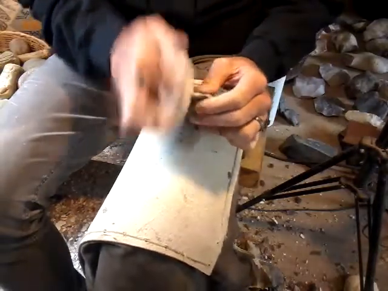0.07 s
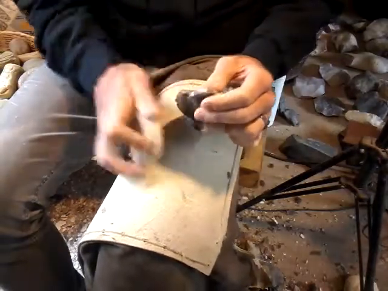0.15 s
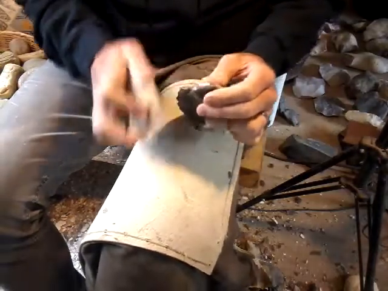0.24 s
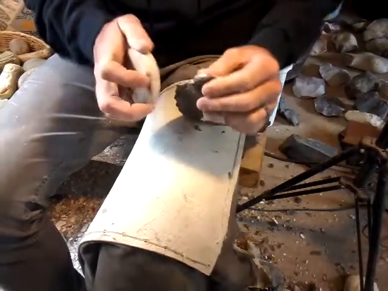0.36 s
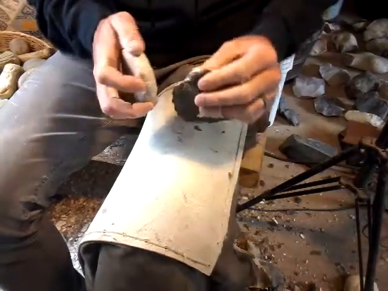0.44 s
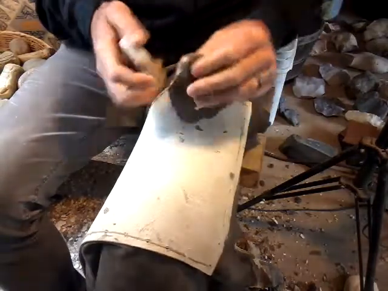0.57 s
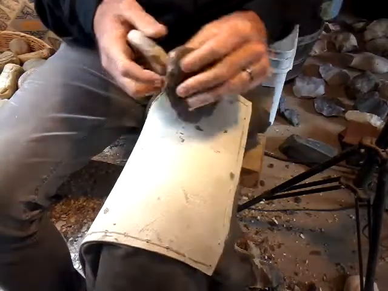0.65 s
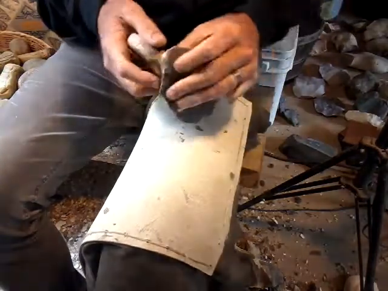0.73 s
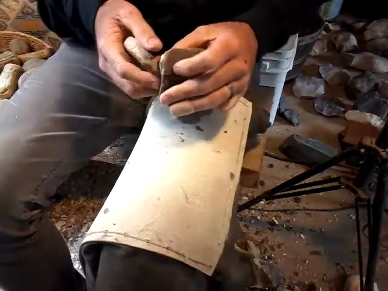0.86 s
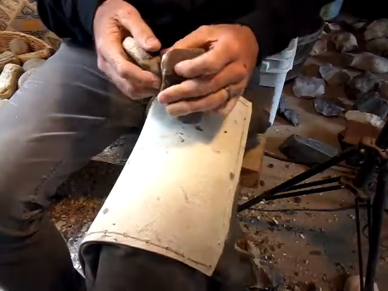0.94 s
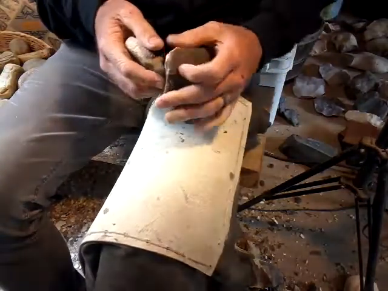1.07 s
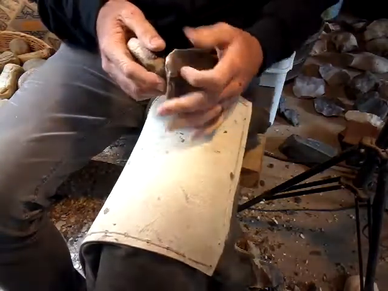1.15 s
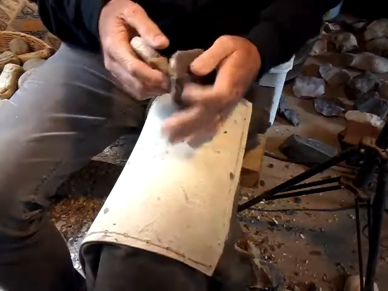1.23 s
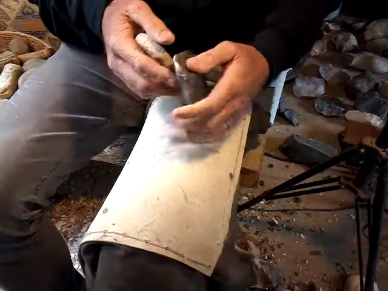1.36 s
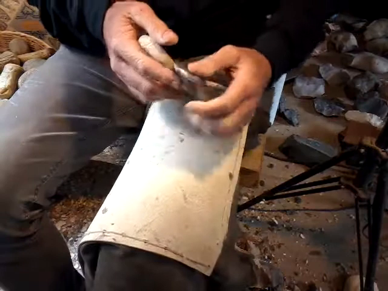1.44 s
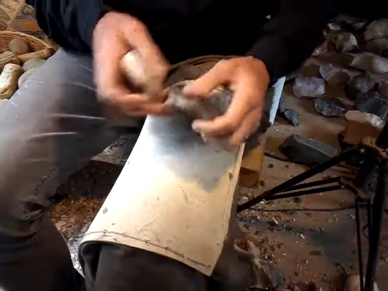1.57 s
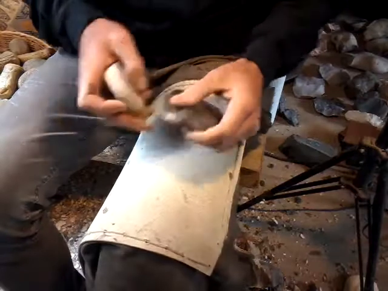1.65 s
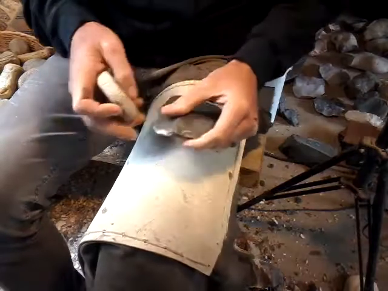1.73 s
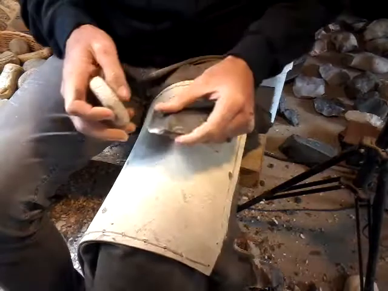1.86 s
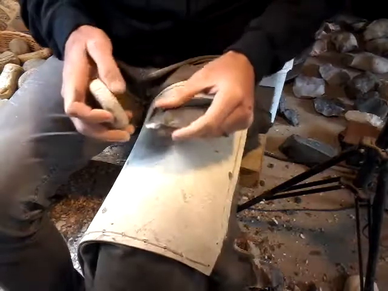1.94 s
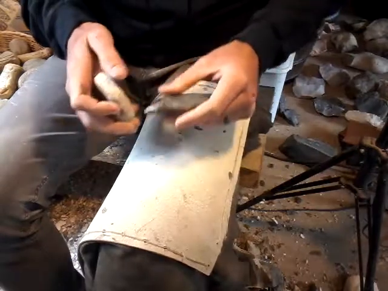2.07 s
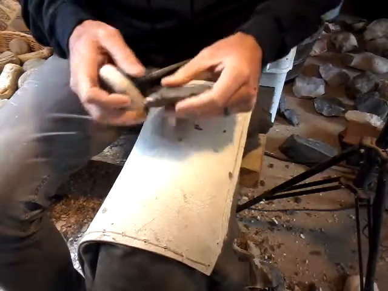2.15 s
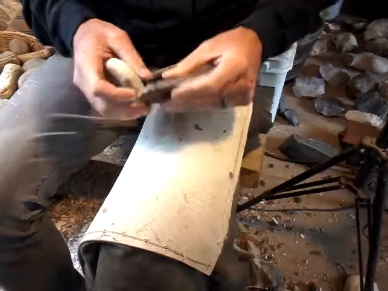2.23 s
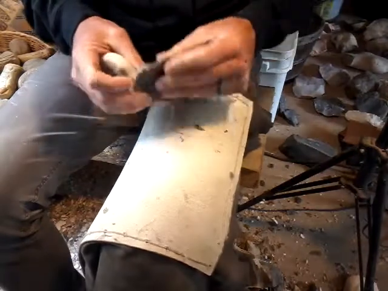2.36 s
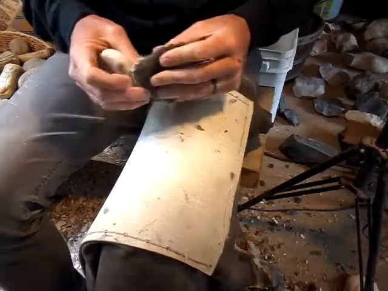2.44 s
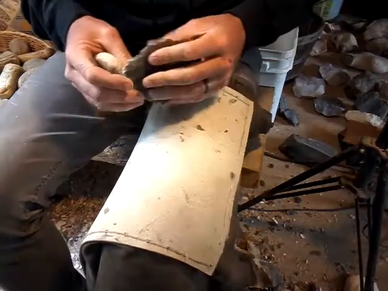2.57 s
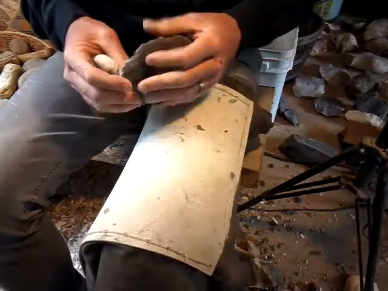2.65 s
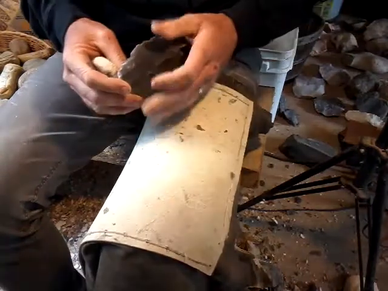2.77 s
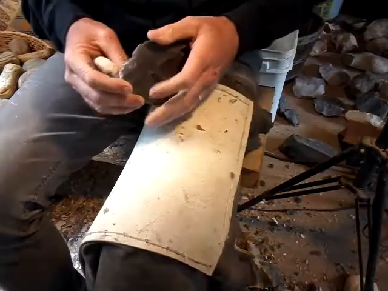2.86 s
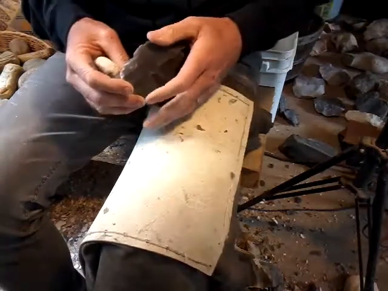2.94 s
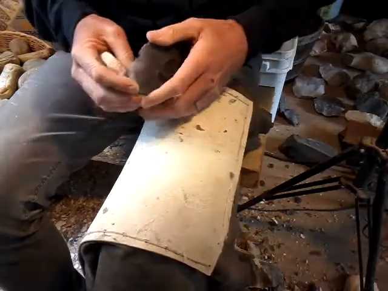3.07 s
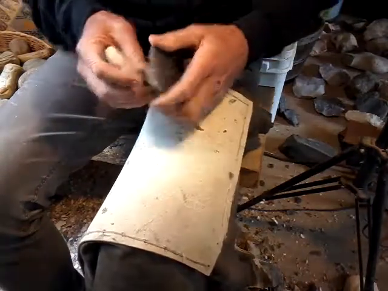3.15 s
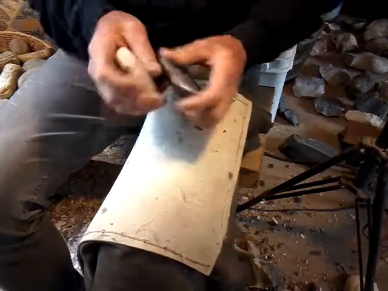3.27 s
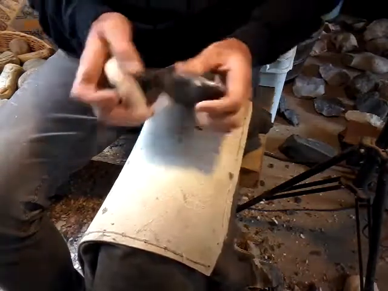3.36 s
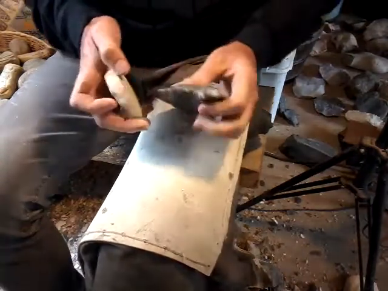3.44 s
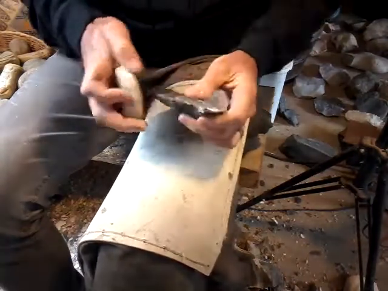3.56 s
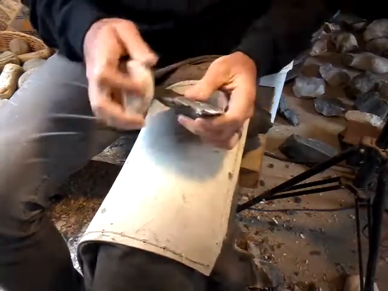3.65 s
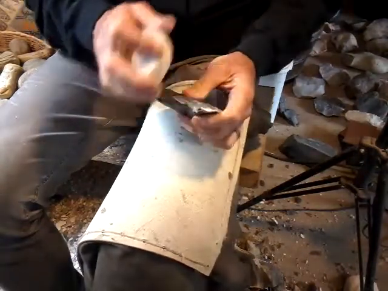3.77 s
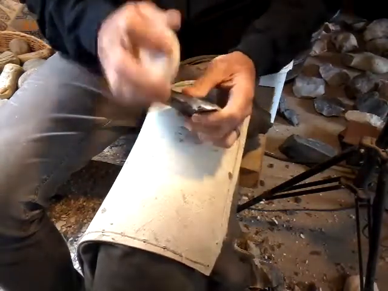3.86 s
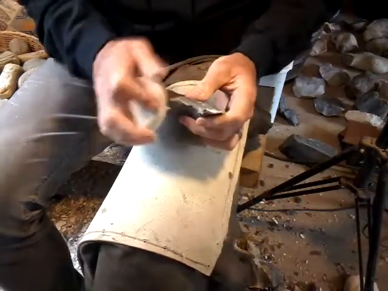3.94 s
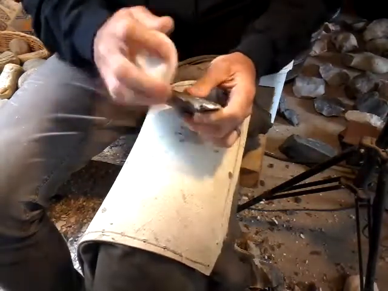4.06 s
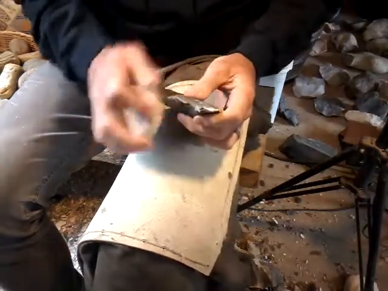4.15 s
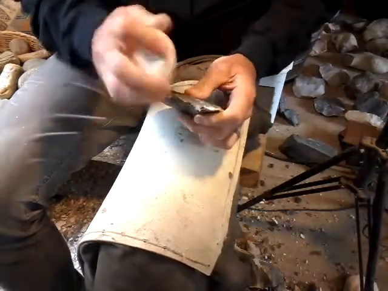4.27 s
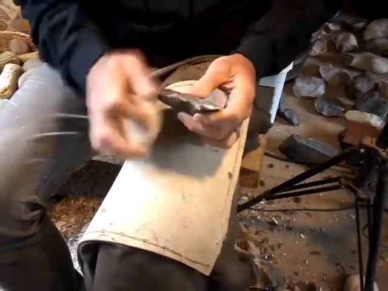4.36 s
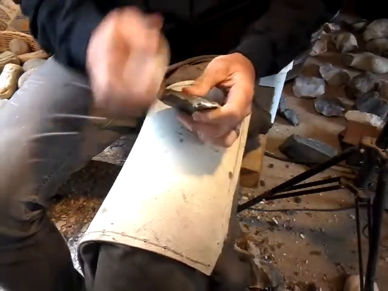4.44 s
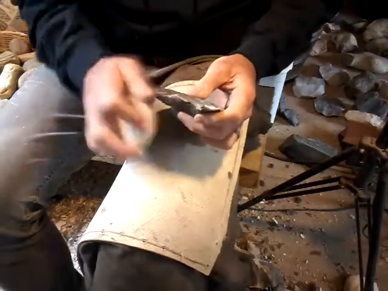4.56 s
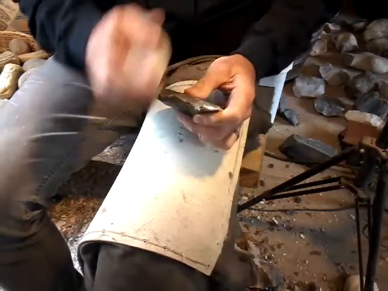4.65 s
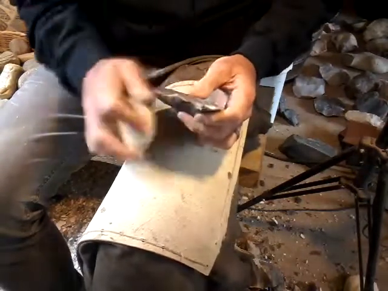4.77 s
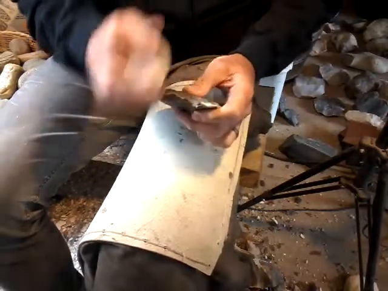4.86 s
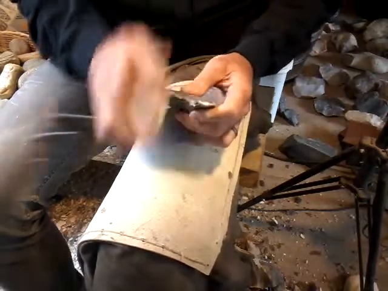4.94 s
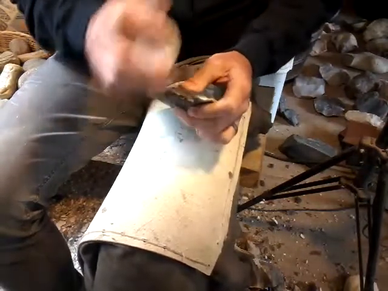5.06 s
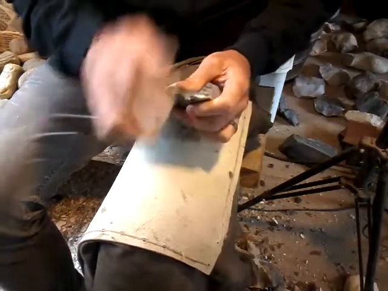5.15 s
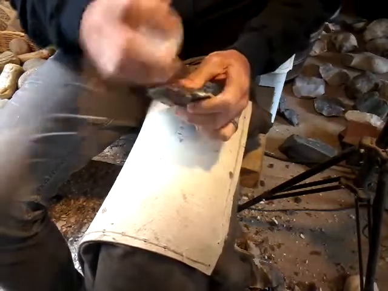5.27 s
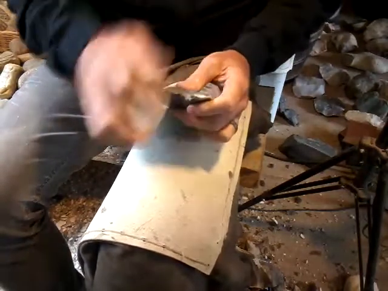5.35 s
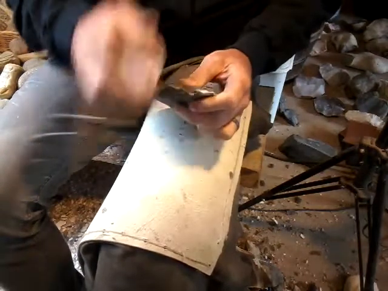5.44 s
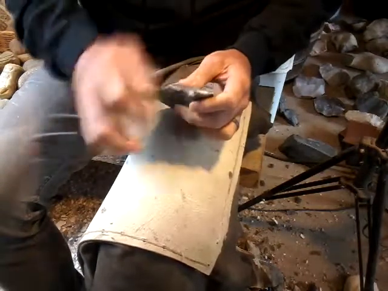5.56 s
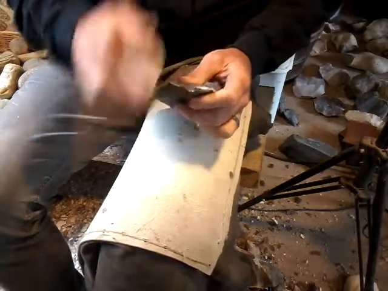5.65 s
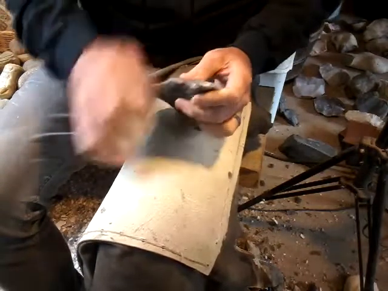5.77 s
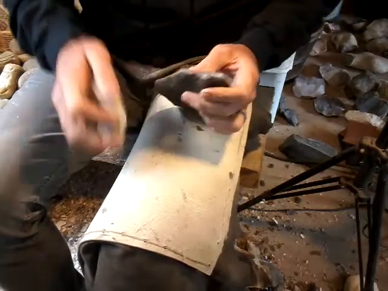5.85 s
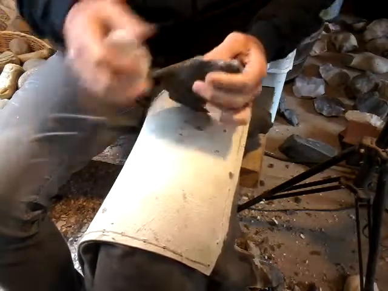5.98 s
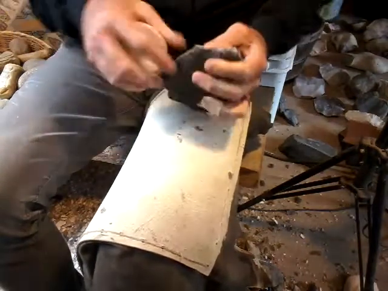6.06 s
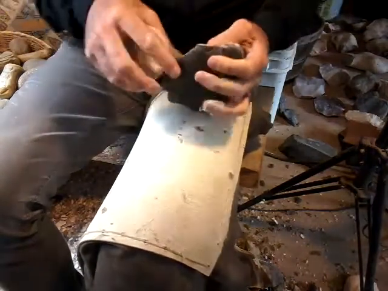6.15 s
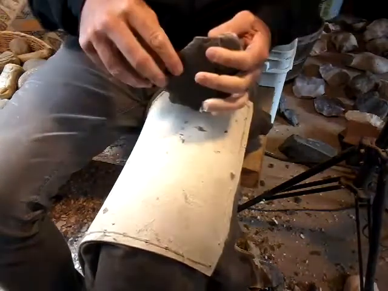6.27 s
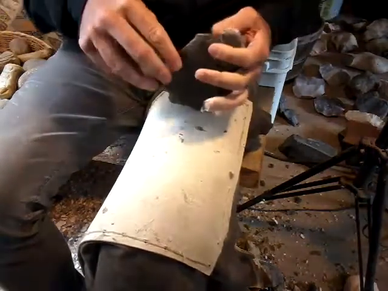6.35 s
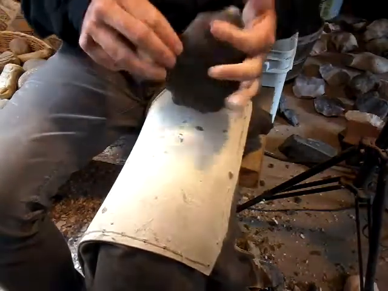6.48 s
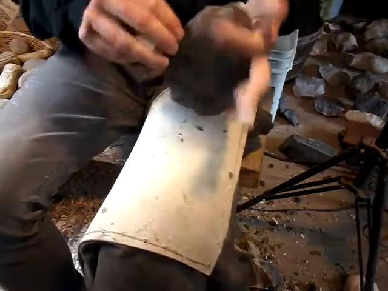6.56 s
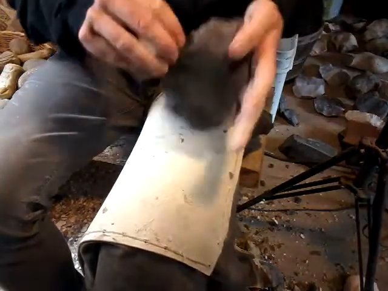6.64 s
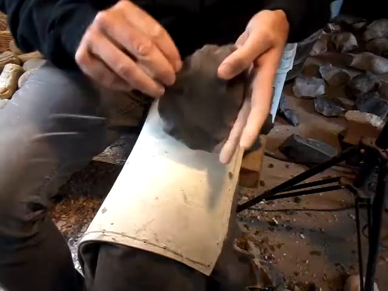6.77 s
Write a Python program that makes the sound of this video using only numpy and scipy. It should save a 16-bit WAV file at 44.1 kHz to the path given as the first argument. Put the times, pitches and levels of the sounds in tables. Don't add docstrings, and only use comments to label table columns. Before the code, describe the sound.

Close stereo pickup in a small shed with short, bright reflections, over faint low hum, cloth rustle and hiss. The tail of a stone stroke opens, then at 0.14 s a loud, hard knock breaks into a gritty crunch of tiny clicks lasting under a tenth of a second. Near quiet follows, with a barely audible tick at 0.4 s. At 1.3 s hands softly bump the lap; around 1.5-1.8 s the stone is turned with small clacks and thin rings. Light taps come at 2.3 s, then dry, hissy skin brushes at 2.4 and 3.0-3.6 s with dull bumps. From 3.97 to 5.83 s, ten short scratchy blows land about every 0.2 s, the first ones lighter, later ones forceful, each a mid-pitched stony crack with crumbling grind. A small tap at 6.14 s and faint clicks and rubs around 6.4-6.6 s finish.

```python
import sys
import numpy as np
from scipy import signal
from scipy.fft import rfft, irfft, next_fast_len
from scipy.io import wavfile
from scipy.ndimage import uniform_filter1d

SR = 44100
rng = np.random.default_rng(int(sys.argv[2]) if len(sys.argv) > 2 else 0)


def ratio(d):
    e = np.asarray(d, float) / 20
    return 10 ** e


def file_out(sig):
    cols = np.atleast_2d(sig).T
    lim = np.clip(cols, -1, 1)
    pcm = np.round(lim * 32767).astype(np.int16)
    wavfile.write(sys.argv[1], SR, pcm)


N = 300321
LEAD = SR // 5
M = N + LEAD


def sample_at(s):
    return int(s * SR) + LEAD


def clock():
    return (np.arange(M) - LEAD) / SR


def row_on(starts):
    return np.clip(np.searchsorted(starts, clock()) - 1, 0, None)


def along(table, size):
    hz, value = np.transpose(table)
    bins = np.arange(size // 2 + 1) * SR / size + 1
    return np.interp(np.log(bins), np.log(np.maximum(hz, 1)), value)


def response(table, size=2048):
    fold = irfft(along(table, size) * np.log(10) / 20)
    fold[1:size // 2] *= 2
    fold[size // 2 + 1:] = 0
    h = irfft(np.exp(rfft(fold)))[:size // 2]
    return h / np.abs(h).max()


def swing(h, hz, damp):
    a = [1, -2 * damp * np.cos(2 * np.pi * hz / SR), damp ** 2]
    h = signal.lfilter(a[::-1], a, h)
    return h / np.abs(h).max()


def through(x, h):
    return signal.fftconvolve(x, h)[:len(x)]


def ring(x, hz, t60):
    pole = np.exp(2j * np.pi * hz / SR - np.log(1000) / (t60 * SR))
    return signal.lfilter([1], [1, -pole], x).imag


# start in seconds, length in seconds, landing in dB, grind in dB, sharpness of the edge in dB.
STROKES = [(-.065, 0.049, -20, -28, 5.5), (0.1378, 0.066, -6, -31.5, -4), (3.965, 0.035, -13.5, -31, -0.5),
           (4.177, 0.027, -19, -38.5, 6.5), (4.3858, 0.028, -8, -31.5, 4), (4.593, 0.013, -6, -29, -6),
           (4.8001, 0.033, -5.5, -27.5, -6.5), (4.9974, 0.017, -6.5, -25, -3.5),
           (5.201, 0.027, -5, -27.5, -0.5), (5.4009, 0.019, -6.5, -26, 5.5),
           (5.5998, 0.027, -2.5, -29.5, -3), (5.8025, 0.032, -3.5, -34.5, 1)]
# time in seconds, body in dB, edge in dB.
TEETH = [(0.1495, -24, -31), (0.1512, -23, -31), (0.1597, -11.5, -29.5), (0.1634, -14.5, -38.5),
         (0.1682, -13.5, -29), (0.1744, -26.5, -30.5), (3.9728, -28, -28), (3.976, -25, -34.5),
         (3.9783, -55, -25), (3.9811, -20, -40), (3.9847, -33.5, -34), (3.9862, -34.5, -40),
         (3.9903, -20.5, -24.5), (3.9941, -34, -29.5), (4.0005, -20, -38), (4.1814, -26, -40.5),
         (4.1842, -53, -37.5), (4.1878, -19, -46), (4.1896, -19.5, -40.5), (4.1926, -27, -56.5),
         (4.1967, -32, -61), (4.199, -20, -27), (4.2008, -28, -32.5), (4.2041, -25, -36),
         (4.3899, -25, -30.5), (4.3941, -16.5, -45), (4.3981, -17.5, -31.5), (4.4046, -12, -22.5),
         (4.5965, -25, -35.5), (4.5994, -13.5, -17), (4.6054, -11.5, -28), (4.6084, -11, -25.5),
         (4.8062, -19.5, -20), (4.8107, -7.5, -23), (4.8159, -7, -26), (5.0033, -22, -37),
         (5.0074, -28.5, -28.5), (5.0102, -21, -29), (5.0128, -12.5, -24.5), (5.2048, -29, -33.5),
         (5.2113, -12, -17.5), (5.2125, -29, -18.5), (5.2155, -11, -33.5), (5.2192, -25, -24),
         (5.2241, -18, -28), (5.2292, -18, -19.5), (5.4038, -7, -29.5), (5.4084, -9, -28),
         (5.4131, -13, -38), (5.4159, -13, -38), (5.4202, -12, -25), (5.4226, -12.5, -15),
         (5.4261, -17, -14), (5.6143, -14, -15), (5.8062, -18.5, -15.5), (5.8111, -10.5, -28),
         (5.815, -11, -23.5), (5.8174, -21.5, -35.5), (5.8211, -19, -18.5)]
# time in seconds, palm in dB, body in dB, edge in dB.
TAPS = [(1.4866, -52, -60, -85), (1.508, -42.5, -27.5, -80), (1.52, -46, -43, -69), (1.5287, -46, -55, -85),
        (1.543, -61, -29.5, -33.5), (1.5494, -60, -36, -39), (1.5554, -59, -34, -54),
        (1.5675, -49, -34, -57), (1.5725, -65, -40, -59), (1.5775, -62, -38.5, -65),
        (1.7747, -75, -53, -64), (1.778, -75, -50, -70), (1.783, -70, -49, -72), (1.803, -68, -48, -80),
        (2.2592, -52, -43.5, -46.5), (2.2649, -59, -44.5, -66), (2.2753, -34.5, -37.5, -69),
        (2.281, -56, -57, -81), (2.291, -51, -51, -66), (2.3778, -57, -53, -78), (2.3867, -48, -67, -75),
        (3.025, -75, -55, -51), (3.03, -75, -62.5, -59), (3.199, -75, -37.5, -51), (3.2079, -61, -43, -51),
        (3.333, -47, -56, -65), (3.5492, -69, -50, -61), (6.1446, -30.5, -32.5, -38),
        (6.437, -52, -72, -54), (6.4782, -54, -52, -78), (6.3935, -82, -70, -61), (3.332, -70.5, -45, -59),
        (6.5198, -72, -52, -69), (6.5335, -70, -67, -75), (6.5403, -75, -61, -55), (6.5555, -67, -61, -58),
        (6.5655, -67, -64, -50), (6.574, -68, -59, -62), (6.5935, -68, -52, -50.5),
        (6.5797, -58, -32.5, -56), (6.5881, -63, -39, -47)]
# time in seconds, level in dB.
SLAPS = [(0.1387, -13.5), (1.5066, -54), (1.55, -38), (2.2579, -40), (2.2662, -43), (3.9787, -45),
         (4.39, -36), (4.5976, -18), (4.817, -15.5), (4.997, -14), (5.01, -28), (5.802, -33.5),
         (5.815, -17.5), (6.144, -39), (6.44, -51), (6.585, -41.5)]
LANDING_PALM_DB, LANDING_EDGE_DB = -17, -10
TOOTH_PALM_DB, TOOTH_PALM_SHARE = -22, 0.49
FACE_DB = -23


def contacts():
    rows = [(s, db + LANDING_PALM_DB, db, db + LANDING_EDGE_DB + sharp) for s, _, db, _, sharp in STROKES]
    rows += [(s, TOOTH_PALM_DB + TOOTH_PALM_SHARE * db, db, edge) for s, db, edge in TEETH]
    rows += TAPS
    rows = [(s, palm, body, (body + edge) / 2 + FACE_DB, edge) for s, palm, body, edge in rows]
    slaps = [(s, -np.inf, -np.inf, db, -np.inf) for s, db in SLAPS]
    return np.transpose(rows + slaps)


# lag in seconds, its spread in seconds as the hands move, level in dB.
PAD_ECHO = (.0018, .0005, -10)


def pad_lags(count):
    lag_s, spread_s, _ = PAD_ECHO
    return np.abs(SR * (lag_s + spread_s * rng.uniform(-1, 1, count))).astype(int)


def knocks(times, db, chatter, chatter_s, lags):
    out, t = np.zeros(M), np.arange(SR // 200) / SR
    crumble = chatter * rng.standard_normal((len(times), len(t))) * np.exp(-t / chatter_s)
    crumble[:, 0] = 1
    for s, gain, shape, lag in zip(times, ratio(db), crumble, lags):
        i = sample_at(s)
        out[i:i + len(t)] += gain * shape
        out[i + lag:i + lag + len(t)] += gain * shape * ratio(PAD_ECHO[2])
    return out


def sliding(rows, fall=0.39, release=0.091):
    out = np.zeros(M)
    for s, length, rise, db in rows:
        i, n = sample_at(s), int(length * (1 + release) * SR)
        shares = [0, np.clip(rise, .01, .9), 1, 1 + release]
        out[i:i + n] += ratio(db) * np.interp(np.arange(n) / SR / length, shares, [0, 0.94, fall, 0.00017])
    return out


def grit(scatter_db, per_s):
    hit, size, sign = rng.random(M), rng.exponential(size=M), rng.standard_normal(M)
    x = (hit < per_s / SR) * ratio(scatter_db * size) * sign
    return x / x.std()


# start in seconds, length in seconds, rise as a share 0-1, body grind in dB, edge grind in dB.
RUBS = [(1.518, 0.02, 0.06, -52.5, -74), (1.539, 0.049, 0, -54, -55.5), (1.645, 0.032, 0.1, -65, -74),
        (1.752, 0.024, 0.56, -73, -74), (2.259, 0.02, 0, -65, -68), (2.271, 0.045, 0.1, -65, -76),
        (3.031, 0.0242, 0, -68.5, -62), (3.204, 0.13, 0, -64.5, -65.5), (3.327, 0.067, 0.14, -60, -65.5),
        (3.945, 0.016, 0.8, -62, -75), (6.141, 0.012, 0.05, -58.5, -62), (6.407, 0.018, 0.23, -89, -71),
        (6.422, 0.028, 0.44, -59.5, -56), (6.52, 0.038, 0.3, -69, -74), (6.547, 0.03, 0.6, -51, -54)]
STROKE_RISE = 0.052
GRIND_BODY_DB, GRIND_EDGE_DB = -4.5, -9


def grinding():
    on_body = [(s, n, STROKE_RISE, db + GRIND_BODY_DB) for s, n, _, db, _ in STROKES]
    on_body += [(s, n, rise, db) for s, n, rise, db, _ in RUBS]
    on_edge = [(s, n, STROKE_RISE, db + GRIND_EDGE_DB + sharp) for s, n, _, db, sharp in STROKES]
    on_edge += [(s, n, rise, db) for s, n, rise, _, db in RUBS]
    return sliding(on_body) * grit(2.2, 5000), sliding(on_edge) * grit(1.8, 9800)


# start in seconds, pitch factor of the body, dB below its peak, dB above its peak.
HOLD = [(-.1, 0.95, 5.5, 1), (.13, 0.97, 1, -4), (1.4, 1.01, 2, 8.5), (1.535, 0.82, -3, 10),
        (2.2, 1.05, 1.5, 0.5), (3.0, .99, -7, -3), (3.94, 1.036, 4, -5.5), (4.17, 1, 1.5, 2),
        (4.38, 1, 4, 0.5), (4.59, 0.98, -0.5, -0.5), (4.79, 1.004, 0, 1.5), (4.99, .99, -0.5, -1.5),
        (5.19, 0.96, 0.1, 0), (5.39, 0.96, -0.5, 0), (5.59, 0.99, -3.3, 1), (5.79, 0.97, -1.1, -1.5),
        (6.1, 1.06, 0, -0.5), (6.5, 1, -8.5, 6)]


def holds():
    return row_on(np.transpose(HOLD)[0])


# frequency in Hz, level in dB.
BODY = [(300, -60.5), (750, -14.5), (1050, -5), (1600, -4), (2000, 2.5), (2550, 1), (3000, -12),
        (4000, -23.5), (6000, -38)]
CUP_LOW_HZ, CUP_HIGH_HZ = 1500, 2700


def body_response(colour):
    return swing(response(colour), 2800, .7)


def cupped(push):
    out, which = np.zeros(M + 1024), holds()
    for k, (_, pitch, low_db, high_db) in enumerate(HOLD):
        colour = [(hz * pitch, db + low_db * (hz < CUP_LOW_HZ) + high_db * (hz > CUP_HIGH_HZ))
                  for hz, db in BODY]
        span = np.flatnonzero(which == k)
        sound = signal.fftconvolve(push[span], body_response(colour))
        out[span[0]:span[0] + len(sound)] += sound
    return out[:M]


# start in seconds, then first, second, third and fourth family in dB.
GRIP = [(-.1, -13.5, -51.5, -31.5, -27), (.13, -22, -47.5, -24.5, -32), (1.48, -30, -4, -14, -30),
        (1.54, -6.5, -15.5, -43, -31), (1.547, -10.5, -26, -41, -13), (1.74, -7, -37, -28, 3),
        (2.25, -29, -41.5, -31, -35), (2.27, -30, -28, 2.5, -10), (2.37, -14, -22, -30, -30),
        (3.0, -39.5, -43, -32, -38), (3.96, -20, -22, -22, -32), (4.17, -33, -20, -20, -29),
        (4.38, -38, -20.5, -32, -45), (4.59, -39, -20.5, -27, -39.5), (4.79, -38, -20, -24, -33),
        (4.99, -22, -25.5, -23, -38), (5.19, -18, -28, -28, -31.5), (5.39, -20.5, -26, -35.5, -30),
        (5.59, -28.5, -23.5, -38, -30.5), (5.79, -24.5, -28.5, -44, -40), (6.14, -8.5, -32, -14, -15),
        (6.38, -16, -25, -20, -6.5), (6.51, -3.5, -17, -22, -2)]
# frequency in Hz, level in dB, t60 in seconds.
FLINT = [
    [(7425, -3, .07), (7390, -6, .05), (7400, -10, .008)],
    [(8755, -2, .065), (8695, -6, .055), (8650, -8, .008)],
    [(9700, 0, .011), (9900, -5, .009)],
    [(13290, -2, .026), (13180, -12, .012), (13000, -12, .005)],
]
LANDING_RING_DB = -9


def flint_ring(scratch):
    strike, out = scratch.copy(), 0
    for s, _, db, *_ in STROKES:
        strike[sample_at(s)] += ratio(db + LANDING_RING_DB)
    start, *free = np.transpose(GRIP)
    which = row_on(start)
    for family, free_db in zip(FLINT, free):
        drive = strike * ratio(free_db)[which]
        out = out + sum(ratio(db) * ring(drive, hz, t60) for hz, db, t60 in family)
    return out


# time in
# seconds, frequency in Hz, level in dB, t60 in seconds.
CHIP = [(.413, 12050, -71, .07), (.413, 9600, -68, .05), (.413, 6000, -68, .012), (1.486, 1300, -54, .015),
        (1.642, 1450, -56, .04), (1.776, 1000, -60, .05), (1.546, 1800, -38, .03), (1.557, 1950, -42, .03),
        (1.7745, 1900, -50, .012), (1.778, 2000, -51, .012), (1.784, 2050, -52, .015),
        (6.146, 650, -49, .025), (6.432, 700, -56, .03), (6.425, 2500, -58, .02), (6.435, 2650, -54, .02),
        (6.437, 4600, -54, .015), (6.431, 4900, -58, .015), (6.5335, 2800, -54, .01),
        (6.5655, 2700, -48, .01), (6.572, 2000, -48, .02), (2.261, 7420, -64, .12), (2.379, 7420, -66, .07),
        (2.288, 8750, -64, .06), (2.522, 2900, -64, .01), (4.562, 2400, -54, .01), (2.276, 620, -42, .02),
        (2.277, 1150, -45, .015), (2.291, 900, -48, .015), (2.378, 650, -48, .02), (2.388, 750, -52, .02),
        (3.2, 125, -52, .15), (3.551, 150, -50, .2), (3.575, 150, -54, .1)]


def chips():
    out, n = np.zeros(M), SR // 5
    for s, hz, db, t60 in CHIP:
        i = sample_at(s)
        out[i:i + n] += ratio(db) * ring(np.arange(n) == 0, hz, t60)
    return out


# start in seconds, length in seconds, level in dB.
BUMPS = [
    (1.314, 0.034, -44.5),
    (1.504, 0.032, -58),
    (3.176, 0.1, -50.5),
    (3.335, 0.095, -54),
    (3.544, 0.074, -42.5),
    (6.138, 0.012, -46),
]
BUMP_RISE, STROKE_THUMP_DB = 0.27, -44.5


def lap_thump():
    on_lap = [(s, n, STROKE_RISE, STROKE_THUMP_DB) for s, n, *_ in STROKES]
    on_lap += [(s, n, BUMP_RISE, db) for s, n, db in BUMPS]
    blow = sliding(on_lap) * ratio(30.5) * ring(rng.standard_normal(M), 125, 0.021) / 16
    return ring(np.diff(blow, 2, prepend=[0, 0]), 160, 0.026)


# frequency in Hz, level in dB.
PALM = [(60, -42), (130, -19), (240, -2), (500, 0), (750, -2), (1000, -8), (1600, -26), (4000, -60)]
# frequency in Hz, level in dB.
EDGE = [(2000, -24), (3500, -12), (4800, -8), (5400, -3.5), (6000, -1), (6600, -8), (7000, -14),
        (8100, -26), (9500, -24), (11000, -34), (12900, -29), (14300, -33), (15500, -29), (17000, -40)]
# frequency in Hz, level in dB.
FACE = [(1500, -43), (2800, -3), (3500, -5.5), (4100, -1), (4800, -6.5), (6500, -39)]


def stones():
    times, palm_db, body_db, face_db, edge_db = contacts()
    lags = pad_lags(len(times))
    palm, body = response(PALM), body_response(BODY)
    edge = swing(response(EDGE), 6000, .8)
    body_grind, edge_grind = grinding()
    shove = knocks(times, palm_db - 7.0, 0.13, 0.0022, lags)
    shove += body_grind * ratio(-8.5) / np.linalg.norm(palm)
    push = knocks(times, body_db - 2.5, 0.034, 0.0035, lags) + body_grind / np.linalg.norm(body)
    scratch = knocks(times, edge_db, 0.19, 0.00074, lags) + edge_grind / np.linalg.norm(edge)
    slap = knocks(times, face_db - 1.5, 0.1, 0.0031, lags)
    out = through(shove, palm) + cupped(push) + through(scratch, edge) + through(slap, response(FACE))
    return out + flint_ring(scratch) + chips() + lap_thump()


# start in seconds, length in seconds, fine hiss in dB,
# middle minus fine in dB, coarse minus fine in dB.
BRUSH = [
    (2.333, 0.15, -71.5, 1, 9),
    (2.385, 0.17, -59, -3, -1.5),
    (3.016, 0.12, -55.5, -3, -12),
    (3.07, 0.2, -64, 1, -2),
    (3.196, 0.12, -55, 2.5, 3.5),
    (3.32, 0.23, -63.5, -3, 0),
    (3.539, 0.13, -64, -5, 3.5),
    (3.658, 0.47, -76.5, 0, 3.5),
]
# frequency in Hz, level in dB.
SKIN = [
    [(3500, -24), (5000, -3), (6100, 5), (6800, -5), (8000, -16), (12000, -20), (16000, -41)],
    [(2000, -23), (3000, 5.5), (4000, 7), (5000, 4), (6500, -41)],
    [(300, -32), (900, -1.5), (1500, -2), (2300, 1), (3000, -3.5), (4500, -25)],
]
BRUSH_ATTACK_S, BRUSH_START_DB, BRUSH_FADE_DB = 0.027, -10.5, -21.5


def brushing(rough_db=1.5, rough_s=0.0044):
    t, out = clock(), 0
    for k, colour in enumerate(SKIN):
        h = response(colour)
        press = 0
        for s, length, *db in BRUSH:
            level = db[0] + (k > 0) * db[k]
            fade = np.interp(t - s, [0, BRUSH_ATTACK_S, length], [BRUSH_START_DB, 0, BRUSH_FADE_DB],
                             -np.inf, -np.inf)
            press = press + ratio(level + fade)
        rough = uniform_filter1d(rng.standard_normal(M), int(rough_s * SR) + 1)
        rubbed = press * ratio(rough_db * rough / rough.std()) * grit(1.45, 14000)
        out = out + through(rubbed, h / np.linalg.norm(h))
    return out * ratio(-4.5)


# frequency in Hz, t60 in seconds, level in dB.
SHED = [(200, 0.21, -0.5), (591, 0.4, -3), (1170, 0.31, -1.5), (1740, 0.32, -5), (2200, 0.31, -3.5),
        (2930, .29, 3.5), (3600, .3, -1), (4440, 0.3, -3.2), (6250, 0.28, -6), (7540, 0.26, -3.5),
        (9450, .21, 0.5), (10300, 0.22, -2), (11600, 0.2, 2), (15900, 0.099, -0.5)]


def shed(x, wet_db=-9, first_s=0.00044, build_s=0.00026):
    size = SR // 2
    t, tail = np.arange(size) / SR, 0
    hz, t60, db = np.transpose(SHED)
    bins = np.arange(size // 2 + 1) * SR / size + 1
    noise = rfft(rng.standard_normal((2, size))) * ratio(along(np.transpose([hz, db]), size))
    for centre in 80 * 2 ** np.arange(0, 8, .5):
        band = irfft(noise * np.clip(1 - 2 * np.abs(np.log2(bins / centre)), 0, 1))
        tail = tail + band * ratio(-60 * t / np.interp(np.log(centre), np.log(hz), t60))
    tail = tail * (1 - np.exp(-np.maximum(t - first_s, 0) / build_s))
    tail = tail * ratio(wet_db) / np.linalg.norm(tail, axis=1, keepdims=True)
    turn = rng.uniform(0, 2 * np.pi, len(HOLD))[holds()]
    return through(x * np.cos(turn), tail[0]) + through(x * np.sin(turn), tail[1])


# frequency in Hz, difference in dB.
PORTS = [(60, -0.5), (400, -1.5), (1300, -1.5), (2400, -3), (4400, -7.5), (6000, -10), (7300, -2.5),
         (8700, 3.5), (11000, 0.5)]


def microphones(heard):
    size = next_fast_len(N)
    lean = uniform_filter1d(along(PORTS, size), size // 80) / 2
    return irfft(rfft(heard, size) * ratio([lean, -lean]), size)[:, :N]


# frequency in Hz, density in dB per Hz.
FLOOR = [(15, -28), (28, -20), (48, -18.5), (70, 1.5), (100, 0), (160, -4), (250, -12), (500, -14),
         (1000, -16.5), (2500, -21.5), (5000, -26.5), (6300, -25), (9000, -32.5), (14000, -27)]
# frequency in Hz, likeness 0-1.
ALIKE = [(60, 0.8), (130, 0.95), (290, 0), (640, 0.9), (1410, 0.7), (3100, 0.8), (6820, 0.05), (10500, 0.7),
         (15000, 1)]
# time in seconds, hum in dB, rustle of clothes in dB.
DRIFT = [(0, 1, 0.1), (.5, 1, -2), (.9, -2, -3), (1.25, 2, 0.1), (1.7, -3, 0.1), (2.3, -4, -1),
         (2.8, -2, -1), (3.2, 3, 0.1), (3.9, -2, 0.1), (4.3, 2, 0.1), (4.6, -1, 0.1), (5.1, 4, 0.1),
         (5.5, 1, 0.1), (5.9, -2, 0), (6.3, 1, 0), (6.8, 0, 0)]
FLOOR_DB, HUM_TOP_HZ, RUSTLE_FROM_HZ = -68, 140, 1500


def floor():
    size = next_fast_len(N)
    mid, side = rfft(rng.standard_normal((2, size)))
    alike = np.sqrt(np.clip(along(ALIKE, size), 0, .99))
    tone = ratio(along(FLOOR, size))
    mid, side = mid * tone * np.sqrt(1 + alike), side * tone * np.sqrt(1 - alike)
    pair = np.array([mid + side, mid - side])
    hz = np.arange(size // 2 + 1) * SR / size
    s, hum_db, rustle_db = np.transpose(DRIFT)
    out = irfft(pair, size)[:, :N]
    scale = ratio(FLOOR_DB) / out.mean(axis=0).std()
    hum_share = 1 / (1 + (hz / HUM_TOP_HZ) ** 4)
    rustle_share = 1 / (1 + (RUSTLE_FROM_HZ / (hz + 1)) ** 2)
    for share, db in ((hum_share, hum_db), (rustle_share, rustle_db)):
        change = ratio(np.interp(np.arange(N) / SR, s, db)) - 1
        out = out + irfft(pair * share, size)[:, :N] * change
    return out * scale


def scene():
    low_cut = signal.butter(3, 65, "high", fs=SR, output="sos")
    work = signal.sosfilt(low_cut, stones() + brushing())
    heard = (work + shed(work))[LEAD:]
    return microphones(heard) + floor()


# frequency in Hz, level in dB.
TOP = [(15680, 0), (15830, -22), (16780, -26), (17000, -70)]
CEILING = 1.1


def camera_input(dry):
    size = next_fast_len(N)
    rounded = CEILING * np.tanh(dry / CEILING)
    return irfft(rfft(rounded, size) * ratio(along(TOP, size)), size)[:, :N]


def low_pass(x):
    return signal.sosfilt(signal.butter(12, 16820, fs=SR, output="sos"), x)


def record(dry):
    mix = camera_input(dry)
    return low_pass(mix)


dry = scene()
out = record(dry)
file_out(out)
```